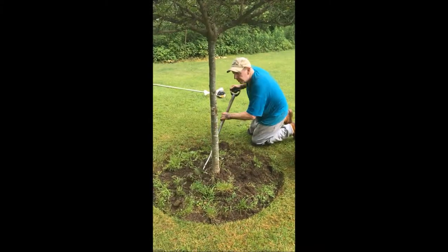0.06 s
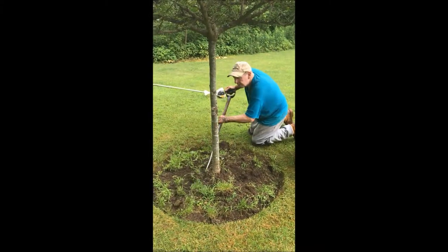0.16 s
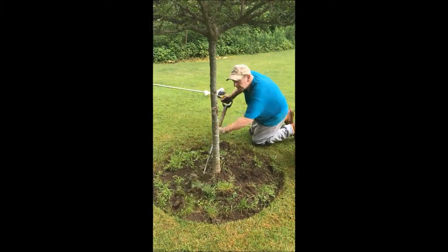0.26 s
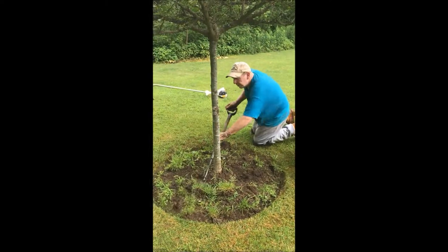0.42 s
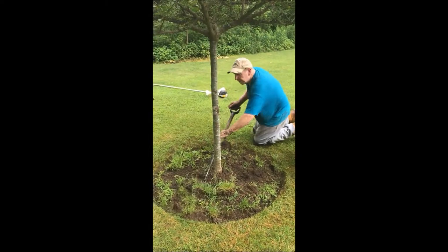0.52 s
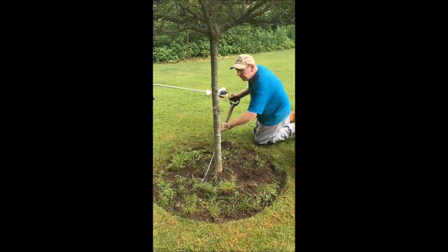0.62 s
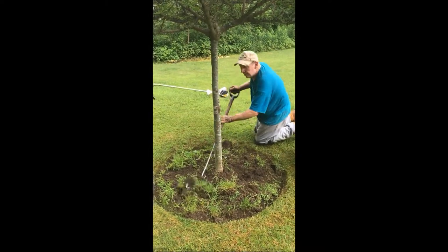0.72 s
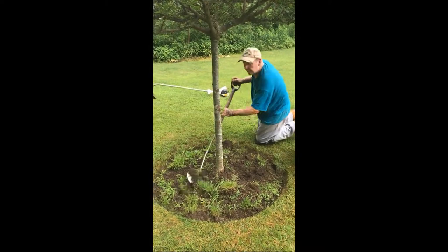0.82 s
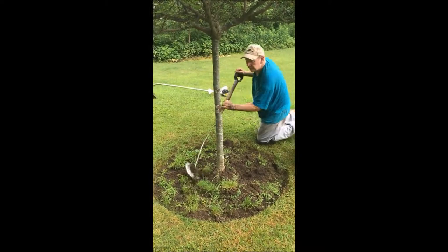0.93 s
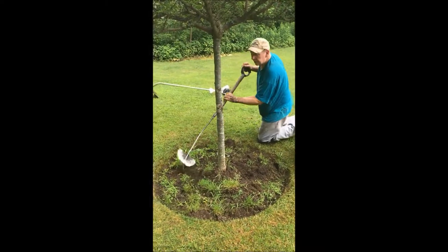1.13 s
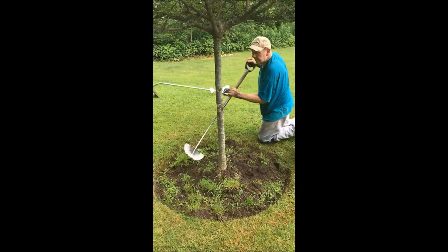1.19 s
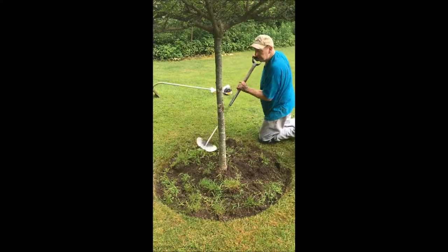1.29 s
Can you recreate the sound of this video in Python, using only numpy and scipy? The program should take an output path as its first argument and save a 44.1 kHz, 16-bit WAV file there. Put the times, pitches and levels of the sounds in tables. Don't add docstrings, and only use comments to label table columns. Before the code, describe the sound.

A steel edging blade bites into turf: faint tearing from 0.1 s, a push at 0.2, then loud root snaps, stone knocks and a short dull thud at 0.26-0.35. Soil trickles quietly. From 0.55 the blade scrapes out, crunching and clinking at 0.7-0.83, fading with light ticks by 1.0. Dry grains click until 1.3. A far engine idles over faint garden rumble and dying leaf rustle; dry, open air.

```python
import sys
import numpy as np
from scipy import signal
from scipy.fft import rfft, irfft
from scipy.io import wavfile
from scipy.ndimage import uniform_filter1d

SR = 44100
rng = np.random.default_rng(int(sys.argv[2]) if len(sys.argv) > 2 else 0)


def level_to_linear(level):
    exponent = np.asarray(level, float) / 20
    return 10 ** exponent


def put_to_file(sound):
    columns = np.atleast_2d(sound).T
    safe = np.clip(columns, -1, 1)
    whole_steps = np.round(safe * 32767)
    wavfile.write(sys.argv[1], SR, whole_steps.astype(np.int16))


N = 59535

# (start [s], length [s], level [dB], sod resonance [Hz], grit relative [dB])
TEARS = [(.008, 0.013, -57.5, 1360, 6), (0.107, 0.03, -57.5, 870, -2.5), (0.128, 0.0095, -58, 2700, -23),
         (.159, 0.0018, -59, 3200, -25), (0.165, 0.0014, -50, 3500, -1), (0.18, 0.0035, -57, 2520, 8.5),
         (0.186, 0.0043, -58, 2240, 0), (0.194, 0.0058, -40, 1010, -6), (0.206, 0.0054, -49.5, 2440, 5),
         (0.2165, 0.002, -38, 890, 6), (.224, .003, -58, 2020, -9), (0.241, 0.0032, -52, 1300, 6),
         (0.2562, 0.0014, -28, 1020, 1), (0.2583, 0.003, -35, 1100, 1), (0.277, 0.006, -29.5, 830, -9),
         (0.283, 0.007, -36, 1110, 1), (0.294, 0.0034, -33, 1300, -18), (0.301, 0.004, -49, 1800, -35),
         (0.317, 0.0071, -40, 1800, -28), (0.3394, 0.0049, -35, 1400, -8), (0.342, 0.004, -28, 2120, -0.5),
         (0.34, 0.011, -33.5, 880, -30), (0.294, 0.035, -45, 217, -33), (0.3498, 0.003, -32, 2580, -11)]
# (start [s], length [s], level [dB], sod resonance [Hz], grit relative [dB])
LOOSENING = [
    (0.084, 0.0089, -70.5, 2580, 7.5),
    (0.496, 0.0075, -62, 2200, -29),
    (0.702, 0.0038, -42, 1360, -26),
    (0.717, 0.0019, -51, 1140, -24),
    (0.721, 0.017, -48, 1431, -11),
    (0.742, 0.0034, -46, 900, 1.5),
    (0.767, 0.016, -44, 1390, -19),
    (0.794, 0.0018, -42, 614, -6),
    (0.7981, 0.004, -47, 1340, 5),
    (1.171, 0.028, -61, 302, -40),
]
# (time [s], level [dB])
SHOVE = [
    (.1, -65),
    (.16, -58.5),
    (0.202, -42.5),
    (0.234, -44.5),
    (0.254, -51),
    (0.269, -39.5),
    (.31, -40),
    (0.337, -40.5),
    (.362, -89),
]
# (frequency [Hz], density [dB per Hz])
GRIT_SPECTRUM = [(1180, -23), (2000, -4.5), (6310, -7), (6880, -5.5), (10200, -12.5), (12800, -14.5),
                 (16000, -19)]
# (time [s],
# peak [dB], pitch [Hz], ring [s])
SNAPS = [(.1665, -38, 3200, .001), (.1865, -31, 2300, .001), (.2170, -19, 800, .0025),
         (.2172, -24, 2400, .0012), (.2174, -24, 3700, .001), (.2565, -13, 1000, .001),
         (.2568, -17, 600, .003), (.2575, -22, 330, .004), (.262, -23, 900, .002), (.2575, -21, 4700, .001),
         (.2598, -19, 1200, .001), (.279, -29, 4300, .004), (.283, -27, 3900, .003),
         (.2855, -32, 6900, .003), (.3185, -27, 1800, .001), (.3435, -27, 8800, .0012),
         (.3436, -15, 2000, .002), (.344, -26, 6000, .001), (.3508, -17, 2500, .0018),
         (.7048, -31, 1250, .0012), (.882, -51, 4250, .006), (.953, -62, 2610, .05)]
# (time [s], level [dB], favoured pitch [Hz], reach [octaves])
CATCHES = [(.7165, -46, 1200, .4), (0.726, -46, 1600, 0.42), (.733, -40.5, 1500, 0.72),
           (0.7449, -33, 1500, 0.18), (.7485, -35.5, 1700, 0.49), (.756, -39, 1600, 0.28),
           (0.7641, -30, 1580, .3), (.770, -36.5, 2700, 0.24), (.7755, -40, 2200, 0.7),
           (0.7959, -39.5, 596, 0.51), (0.7987, -27, 2500, 0.86), (.7995, -32.5, 1010, 0.15),
           (.806, -48, 2700, 0.31), (.8175, -40.5, 1800, .6), (.824, -41, 2065, 0.37),
           (0.2604, -19.5, 2630, 0.29), (.2665, -33, 2100, 0.24), (.2735, -27, 1020, 0.22),
           (0.2945, -21, 1300, 0.44), (0.324, -37, 3200, .3), (0.3382, -19, 1490, 0.52),
           (0.347, -17.5, 2600, 0.12), (0.3527, -19, 2730, 0.4)]
# (frequency [Hz], level [dB], T60 [s])
LOADED_MODES = [(540, -13.5, 0.14), (1010, -8, 0.024), (1488, 3.5, 0.086), (1730, -20, 0.055),
                (1905, -5, 0.13), (2065, -3, .1), (2630, -10, 0.11), (2694, 1.5, 0.077), (3200, 0, 0.091),
                (3460, -3.5, 0.076), (4420, -22, 0.064), (5340, -12, .06), (5700, -1, .05),
                (6200, -13, .05)]
# (time [s], peak [dB], frequency [Hz], width [Hz])
SPECKS = [
    (1.075, -56, 4000, 4000),
    (1.1123, -53, 7000, 4000),
    (1.128, -66, 7000, 4000),
    (1.1614, -43.5, 5470, 7000),
    (1.259, -45, 11000, 4000),
    (1.284, -54, 7000, 6000),
    (.9358, -46, 2000, 2500),
]
# (time [s], level [dB])
DRAG = [(0.549, -76), (0.573, -58), (.59, -59.5), (.605, -57), (0.659, -52), (0.692, -55.5), (0.727, -52.5),
        (.746, -49.5), (.758, -49.5), (0.768, -50), (.789, -53.5), (0.814, -60), (0.824, -53),
        (0.851, -65.5), (.885, -61), (0.921, -71), (1.06, -69)]
# (frequency [Hz], width [Hz], level [dB])
NECK_RINGS = [(1530, 72, 5.5), (1684, 11, -2), (2800, 41, -1), (3380, 140, 4.5), (4120, 36, 3)]
# (frequency [Hz], level [dB], T60 [s])
FREE_MODES = [(2700, 4.5, 0.04), (3540, 2, 0.057), (4560, -3.5, 0.095), (4150, -10, 0.02),
              (5595, -1.5, 0.065), (6060, -16, 0.053), (7170, -3, 0.062), (8200, -9, 0.014),
              (9230, -3, 0.041), (9750, -9, 0.06), (10860, -16, 0.04), (11100, -4, 0.061),
              (12300, -3, 0.048), (13800, -33, 0.21)]
# (time [s], level [dB], favoured pitch [Hz], reach [octaves])
TICKS = [(.57, -81, 8200, 0.46), (0.588, -51, 4600, 0.91), (0.619, -57, 6900, 0.24),
         (0.65, -55, 5360, 0.31), (0.7989, -42.5, 8900, 0.19), (0.823, -51, 3400, 0.23),
         (.8240, -48.5, 10500, 0.6), (0.88, -79, 4600, 0.43), (0.8806, -58.5, 11000, 0.44),
         (0.907, -61, 9230, 0.18), (0.9352, -45, 6740, 0.92), (0.965, -60.5, 11100, 0.3),
         (1.015, -56.5, 12600, 0.52), (1.022, -59.5, 8600, 0.32)]
# (time [s], rate [Hz])
IDLE_RATE = [(0, 25.27), (0.301, 25.98), (.6, 25.51), (1.001, 25.9), (1.35, 26.02)]
# (multiple of firing rate, level [dB])
IDLE_ORDERS = [(2, -52.5), (3, -56), (4, -65), (5, -62), (6, -64), (7, -100), (8, -70), (9, -70),
               (10, -76.5), (13, -79.5)]
# (frequency [Hz], density [dB per Hz])
GARDEN_SPECTRUM = [(40, 2), (110, -0.5), (240, -12), (480, -17.5), (1300, -16), (3000, -24), (7000, -35),
                   (15000, -35.5)]


def svf(x, hz, width_hz):
    b, a = signal.iirpeak(min(hz, .45 * SR), hz / width_hz, SR)
    return signal.lfilter(b, a, x)


def unit(x):
    return x / np.sqrt(np.mean(x ** 2))


def colour(x, points):
    hz, db = np.transpose(points)
    log_hz = np.log(np.arange(len(x) // 2 + 1) * SR / len(x) + 1)
    return irfft(rfft(x) * level_to_linear(np.interp(log_hz, np.log(hz), db)), len(x))


def track_db(t, points):
    s, db = np.transpose(points)
    return np.interp(t, s, db, left=-120, right=-120)


def walk(rate_hz):
    hold = int(SR / rate_hz)
    steps = np.repeat(rng.standard_normal(N // 64), hold)[:N]
    return unit(uniform_filter1d(uniform_filter1d(steps, hold), hold))


def crumbs(patchy_db, rate_hz):
    out = np.zeros(N)
    for hz in 150 * 2 ** np.arange(0, 6.8, .25):
        flare = level_to_linear(patchy_db * walk(rate_hz * min(hz / 2000, 1) ** .5))
        out += flare * svf(rng.standard_normal(N), hz, hz / 5)
    return unit(out)


def strike(modes, pitch_hz, reach_oct):
    click = 1. * (np.arange(SR // 10) == 0)
    out = np.zeros(len(click))
    for hz, db, t60_s in modes:
        gain = np.exp(-(np.log2(hz / pitch_hz) / reach_oct) ** 2 / 2)
        r = np.exp(-np.log(1000) / (t60_s * SR))
        w = 2 * np.pi * hz / SR
        out += gain * level_to_linear(db) * signal.lfilter([0, np.sin(w)], [1, -2 * r * np.cos(w), r * r], click)
    return out / np.abs(out).max()


def roots(t):
    rise_fraction, fall_s, settle_db, settle_s = 0.36, 0.0037, -26, 0.012
    sod_width, low_db, low_hz = 0.38, -16.5, 288
    grain = crumbs(5.5, 300)
    grit = unit(colour(grain, GRIT_SPECTRUM))
    out = np.zeros(N)
    for s, length_s, db, hz, grit_db in TEARS + LOOSENING:
        i = slice(int(s * SR), int(s * SR) + SR // 8)
        u = np.maximum(t[i] - s, 0)
        late = np.maximum(u - length_s, 0)
        env = np.minimum(u / (rise_fraction * length_s), 1)
        env = env * (np.exp(-late / fall_s) + level_to_linear(settle_db) * np.exp(-late / settle_s))

        def match(y):
            return y / np.sqrt(np.sum(y ** 2) / np.sum(env ** 2))

        x = grain[i] * env
        sod = match(svf(svf(x, hz, sod_width * hz), hz, 3 * hz))
        low = match(svf(svf(x, low_hz, 176), low_hz, 260))
        out[i] += level_to_linear(db) * (sod + level_to_linear(low_db) * low + level_to_linear(grit_db) * match(grit[i] * env))
    crushed = unit(svf(grain, 1300, 3900)) + level_to_linear(-45) * grit
    out += level_to_linear(track_db(t, SHOVE)) * crushed
    after = np.maximum(t - TEARS[-1][0], 0)
    trickle = (after > 0) * np.exp(-after / 0.21) * unit(svf(grain, 1800, 2600))
    return out + level_to_linear(-57) * trickle


def snaps(t):
    out = np.zeros(N)
    for s, db, hz, ring_s in SNAPS:
        u = np.maximum(t - s, 0)
        out += level_to_linear(db) * np.exp(-u / ring_s) * np.sin(2 * np.pi * hz * u)
    return signal.sosfilt(signal.butter(2, 260, "high", fs=SR, output="sos"), out)


def thud(t):
    start_s, level_db, from_hz, to_hz, sag_s, fade_s = .2565, -29, 250, 60, .010, .021
    u = np.maximum(t - start_s, 0)
    hz = to_hz + (from_hz - to_hz) * np.exp(-u / sag_s)
    env = (u / fade_s) ** 0.12 * np.exp(-(u / fade_s) ** 2 / 2)
    return level_to_linear(level_db) * env * np.sin(2 * np.pi * np.cumsum(hz * (u > 0)) / SR)


def catches():
    buried_until_s, buried_fade_s, free_fade_s = .4, .004, .025
    out = np.zeros(N)
    for s, db, hz, reach_oct in CATCHES:
        y = strike(LOADED_MODES, hz, reach_oct)
        fade_s = buried_fade_s if s < buried_until_s else free_fade_s
        y = y * np.exp(-np.arange(len(y)) / SR / fade_s)
        out[int(s * SR):][:len(y)] += level_to_linear(db) * y / np.abs(y).max()
    return out


def scrape(t):
    neck_db, neck_per_db, hiss_db, hiss_hz, ring_db = 2.5, 3, -6, 4930, -5.5
    neck_flicker_db, ring_flicker_db, ring_blur = 2.5, 4, 4
    pressure_db = track_db(t, DRAG) + 0.77 * walk(119.2)
    x = crumbs(3.0, 250)
    neck = 1.9 * unit(svf(x, 1600, 1400))
    for hz, width_hz, db in NECK_RINGS:
        neck += level_to_linear(db + neck_flicker_db * walk(59.8)) * unit(svf(x, hz, 1.9 * width_hz))
    rings = np.zeros(N)
    for hz, _, t60_s in FREE_MODES:
        rings += level_to_linear(ring_flicker_db * walk(39.8)) * unit(svf(x, hz, ring_blur / t60_s))
    hiss = unit(svf(svf(x, hiss_hz, 6500), hiss_hz, 21500))
    bright = level_to_linear(hiss_db) * hiss + level_to_linear(ring_db) * unit(rings)
    top_db = max(db for _, db in DRAG)
    neck_level_db = top_db + neck_db + neck_per_db * (pressure_db - top_db)
    return level_to_linear(pressure_db) * bright + level_to_linear(neck_level_db) * unit(neck)


def ticks(t):
    tick_s, crack_db = .0025, 11
    out = np.zeros(N)
    noise = rng.standard_normal(N)
    for s, db, hz, reach_oct in TICKS:
        i = slice(int(s * SR), int(s * SR) + SR // 10)
        x = noise[i] * np.exp(-(t[i] - t[i][0]) / tick_s)
        crack = svf(x, hz, reach_oct * hz)
        out[i] += level_to_linear(db) * (3 * strike(FREE_MODES, hz, reach_oct)[:len(x)] + level_to_linear(crack_db) * crack)
    return out


def specks():
    out = np.zeros(N)
    click = 1. * (np.arange(SR // 100) == 0)
    for s, db, hz, width_hz in SPECKS:
        y = svf(click, hz, width_hz)
        out[int(s * SR):][:len(y)] += level_to_linear(db) * y / np.abs(y).max()
    return out


def idle(t):
    wobble_db, wobble_rad = 1.8, .6
    s, rate_hz = np.transpose(IDLE_RATE)
    phase = 2 * np.pi * np.cumsum(np.interp(t, s, rate_hz)) / SR
    out = np.zeros(N)
    for k, db in IDLE_ORDERS:
        level = np.sqrt(2) * level_to_linear(db + wobble_db * walk(7.86))
        offset_rad = 2 * np.pi * rng.random() + wobble_rad * walk(5.9)
        out += level * np.sin(k * phase + offset_rad)
    return out


def garden(t):
    rustle = unit(svf(crumbs(6.6, 61.6), 4000, 3600))
    rustle = rustle * level_to_linear(-63 + 1.0 * walk(22.994)) * np.exp(-t / 0.95)
    air = crumbs(0.99, 30.7) + rng.standard_normal(N)
    return level_to_linear(-58) * unit(colour(air, GARDEN_SPECTRUM)) + rustle


def scene():
    t = np.arange(N) / SR
    stutter_db = 2 * np.clip(walk(400), -2.5, 1)
    torn = roots(t) * level_to_linear(stutter_db)
    blade = thud(t) + catches() + scrape(t) + ticks(t)
    mix = torn + snaps(t) + blade + specks() + idle(t) + garden(t)
    return mix[None]


def roll_off(x):
    return signal.sosfilt(signal.butter(12, 16840, fs=SR, output="sos"), x)


def record(dry):
    x = signal.sosfilt(signal.butter(4, 42, "high", fs=SR, output="sos"), dry)
    x = signal.sosfilt(signal.ellip(8, .2, 70, 15900, fs=SR, output="sos"), x)
    return roll_off(x)


dry = scene()
out = record(dry)
put_to_file(out)
```